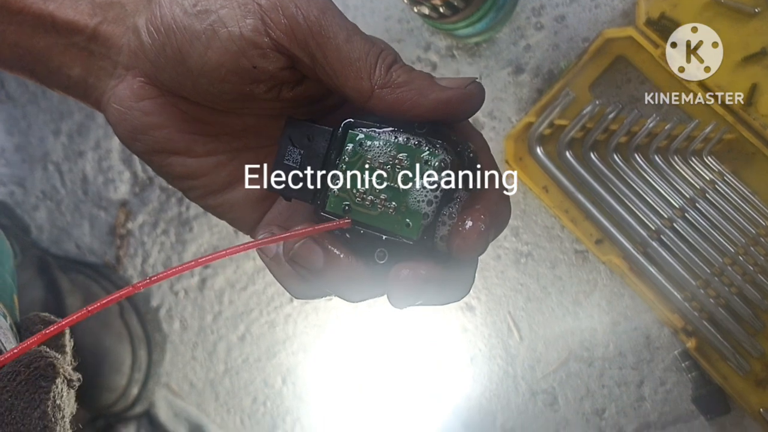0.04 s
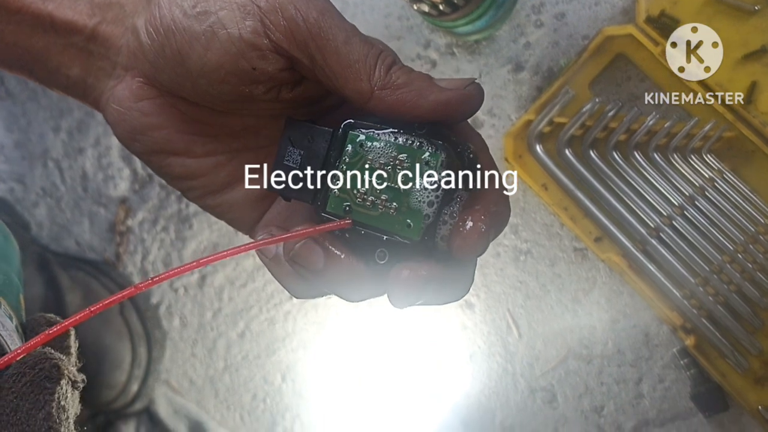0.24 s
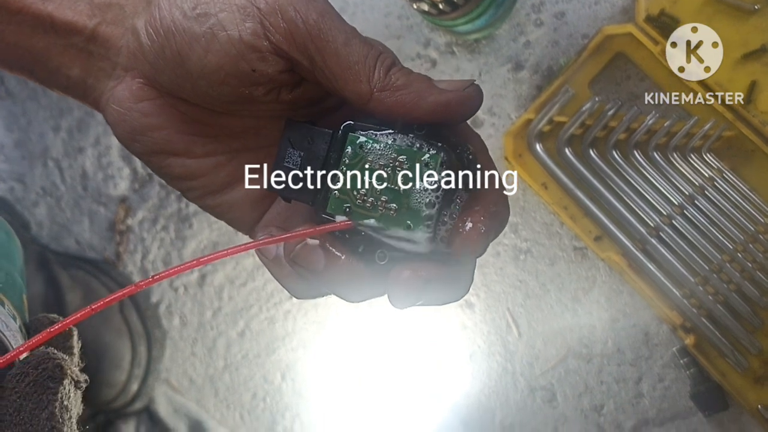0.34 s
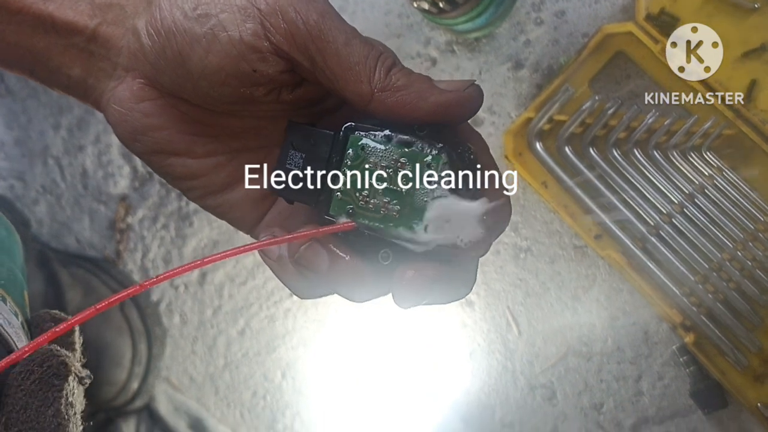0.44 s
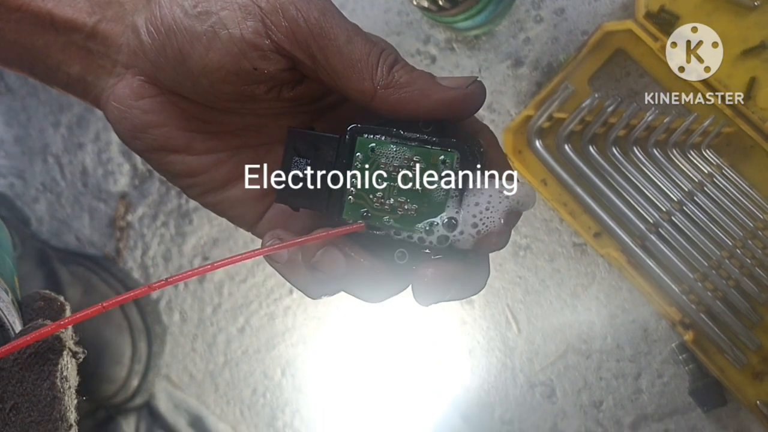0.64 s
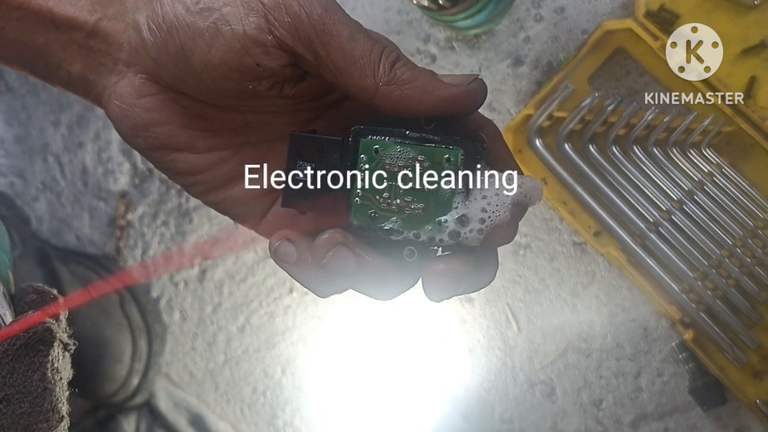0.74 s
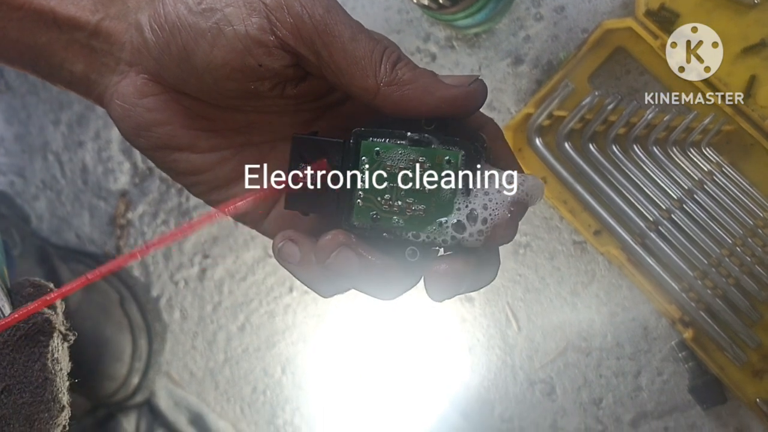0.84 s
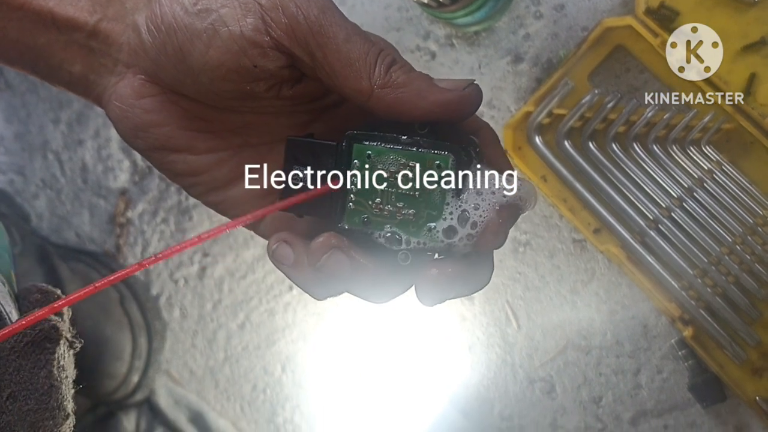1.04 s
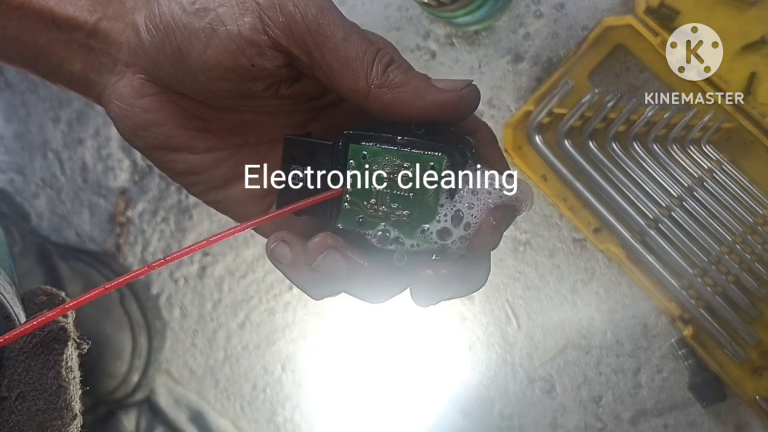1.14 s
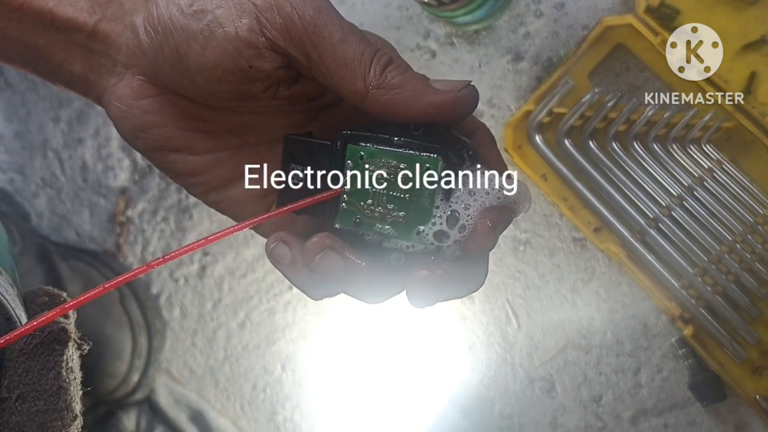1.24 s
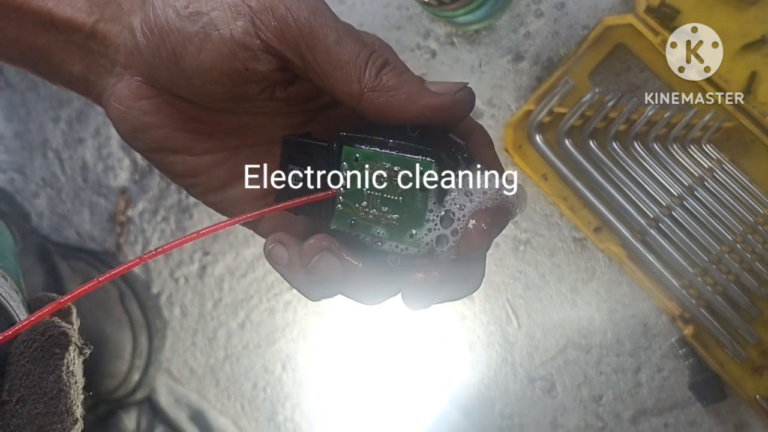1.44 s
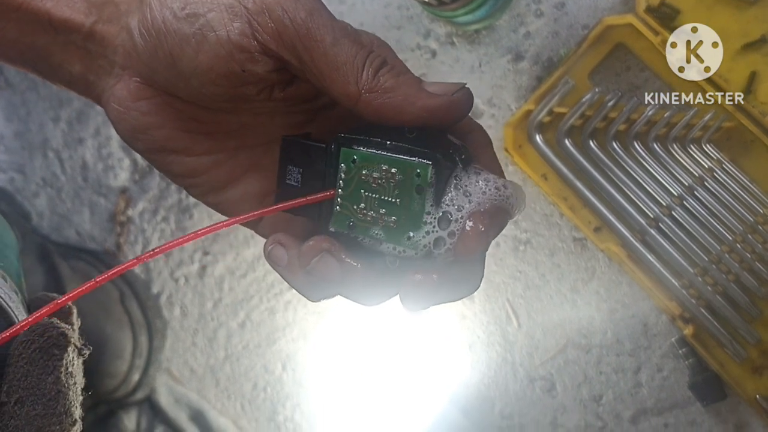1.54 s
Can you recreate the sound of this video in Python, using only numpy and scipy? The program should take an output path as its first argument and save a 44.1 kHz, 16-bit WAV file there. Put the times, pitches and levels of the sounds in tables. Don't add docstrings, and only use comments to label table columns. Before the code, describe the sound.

An aerosol can sprays one short, bright burst through a thin straw at about 0.4 to 0.6 seconds, hissing and faintly whistling, with wet splash and foam on a circuit board. Low gas puffs buffet the close phone microphone from 0.2 to 0.4. Quiet workshop murmur and motor hum continue; from 1.25 a far motor whines upward. Left channel carries everything; right holds only faint hiss.

```python
import sys
import numpy as np
from scipy import signal
from scipy.fft import rfft, irfft
from scipy.io import wavfile
from scipy.ndimage import uniform_filter1d

SR = 44100
rng = np.random.default_rng(int(sys.argv[2]) if len(sys.argv) > 2 else 0)


def gain_from_db(level_db):
    decades = np.asarray(level_db, float) / 20
    return 10 ** decades


def master(y):
    cut = np.clip(np.atleast_2d(y).T, -1, 1)
    pcm = np.round(cut * 32767)
    wavfile.write(sys.argv[1], SR, pcm.astype(np.int16))


N = 70560


def level(x, db):
    return x * gain_from_db(db) / np.sqrt(np.mean(x ** 2))


def noise():
    return rng.standard_normal(N)


def colour(x, table):
    f = np.maximum(np.fft.rfftfreq(N, 1 / SR), 1)
    hz, db = np.array(table, float).T
    fall_db = 18 * np.minimum(np.log2(f / hz[0]), 0)
    gain_db = np.interp(np.log(f), np.log(hz), db) + fall_db
    return level(irfft(rfft(x) * gain_from_db(gain_db), N), 0)


def band(x, hz, width_hz):
    return level(signal.lfilter(*signal.iirpeak(hz, hz / width_hz, SR), x), 0)


def band_twice(x, hz, width_hz):
    return band(band(x, hz, width_hz), hz, width_hz)


def walk(rate_hz):
    hold = int(SR / rate_hz)
    steps = np.repeat(rng.standard_normal(N // hold + 1), hold)
    smooth = uniform_filter1d(uniform_filter1d(steps, hold), hold)[:N]
    return smooth / smooth.std()


def bump(t, centre_s, spread_s):
    return np.exp(-.5 * ((t - centre_s) / spread_s) ** 2)


def turbulence():
    drops_per_s, scatter_db, drop_share = 14000, 1.0, 0.4
    chance, side, size = rng.random((3, N))
    clicks = (chance < drops_per_s / SR) * np.sign(side - .5)
    drops = clicks * gain_from_db(-scatter_db * np.log(size + 1e-9))
    return np.sqrt(drop_share) * level(drops, 0) + np.sqrt(1 - drop_share) * noise()


# start_s, jet_level_db, splash_level_db (re jet)
VALVE = [
    (0.404, -58.5, -10),
    (0.405, -37, -19.5),
    (.415, -28, -16),
    (.423, -28, -18.5),
    (.47, -20, -16),
    (.52, -21.5, -21),
    (0.573, -25, -15),
    (.586, -32.5, -19.5),
    (0.592, -39, -11.5),
]


def valve(t):
    start_s, jet_db, splash_db = np.array(VALVE).T
    dribble_db = 899.5 * np.maximum(t - start_s[-1], 0)
    flow_db = np.interp(t, start_s, jet_db, left=-140) + 8.5 - dribble_db
    return start_s, flow_db, flow_db + np.interp(t, start_s, splash_db) + 3.0


# pitch_hz, level_db (per Hz)
JET_TONE = [(6000, -23), (9300, -17), (10300, -10.5), (11400, -8.5), (12500, 0), (14000, -2), (15500, -3.5)]


def jet(t, flow_db):
    sputter_db = 2.5 * bump(t, 0.4225, 0.00195)
    return colour(turbulence(), JET_TONE) * gain_from_db(flow_db + 0.707 * walk(150.65) + sputter_db)


# pitch_hz, level_db (per Hz)
SPLASH_TONE = [(500, -19), (1200, -6), (2500, -4.5), (3400, 3.5), (4500, 0), (6500, 0.5), (9000, -13),
               (11000, -2)]


def splash(splash_db):
    return colour(turbulence(), SPLASH_TONE) * gain_from_db(splash_db + 0.7 * walk(62.8))


def foam(t, open_s, shut_s):
    ending = np.clip((shut_s - t) / 0.037, 0, 1)
    swell = bump(t, 0.5052, 0.0468) * (t > open_s) * ending
    roar = band(turbulence(), 1950, 1470) * gain_from_db(-38)
    gurgle = band_twice(turbulence(), 431, 515) * gain_from_db(-43)
    return (roar + gurgle) * swell


def straw(t, flow_db, open_s, shut_s):
    note_db = 0.53 * flow_db - 7 - 24.5 + 0.87 * walk(37.17)
    return band(turbulence(), 3430, 396) * gain_from_db(note_db) * (t > open_s) * (t < shut_s)


def room(t, x):
    t60_s, level_db, broad_db = 0.42, -25, -1
    tail = band(noise(), 11900, 5800) + gain_from_db(broad_db) * band(noise(), 4200, 5000)
    tail = (tail * np.exp(-np.log(1000) * t / t60_s))[:SR // 2]
    tail = tail / np.sqrt(np.sum(tail ** 2))
    return gain_from_db(level_db) * signal.fftconvolve(x, tail)[:N]


def spray(t):
    start_s, flow_db, splash_db = valve(t)
    shut_s = start_s[-1]
    burst = jet(t, flow_db) + splash(splash_db) + foam(t, start_s[0], shut_s)
    burst = burst + straw(t, flow_db, start_s[1], shut_s)
    return burst + room(t, burst)


# centre_s, peak_db, pitch_hz, length_cycles
PUFFS = [(.025, -39.5, 101.8, 4.33), (0.059, -39, 94.3, 2.08), (.1, -61.5, 79.6, 1.46),
         (0.171, -42.5, 85, 1.78), (0.731, -50.5, 89.5, 3.6), (0.819, -34, 88.4, 0.89),
         (0.213, -19, 100, 1.983), (.244, -21.5, 129.6, 1.746), (.258, -28, 191, 1.4),
         (.273, -19.5, 154.1, 1.28), (.288, -23.5, 194, 2.1), (0.299, -26.5, 107, 1.63),
         (0.3166, -14.5, 170, 0.64), (0.31, -18.5, 96, 0.93), (0.335, -28, 88, 1.31),
         (0.3576, -16.5, 136.4, 1.447), (0.3726, -13, 305.6, 0.874), (.38, -15, 107.8, 0.768),
         (.39, -14, 141.1, 1.502), (.409, -22, 149.6, 1.65), (.436, -30, 110.7, 3.86),
         (0.468, -26.5, 135, 1.32), (0.488, -30, 99.7, 1.4), (0.523, -35.5, 133, 1.38),
         (0.567, -35.5, 96.7, 1.21), (0.593, -33.5, 84.7, 1.55), (0.639, -32.5, 106.4, 1.48),
         (1.092, -45.5, 89.4, 2.28), (1.49, -44, 95, 2.56)]


def puffs(t):
    lean, edge = 1.1, 0.35
    push, size = np.zeros(N), np.zeros(N)
    for centre_s, peak_db, pitch_hz, cycles in PUFFS:
        turn = (t - centre_s) * pitch_hz
        shape = gain_from_db(peak_db) * bump(turn, 0, 0.4283 * cycles)
        swing = np.cos(2 * np.pi * turn)
        swing = swing - lean * gain_from_db(peak_db + 8) * np.sin(2 * np.pi * turn)
        swing = swing + edge * gain_from_db(peak_db + 4.5) * np.cos(4 * np.pi * turn)
        push = push + shape * swing
        size = size + shape
    eddies = band_twice(noise(), 286, 200) * size * gain_from_db(-22)
    port = signal.butter(2, 54.5, "high", fs=SR, output="sos")
    return signal.sosfiltfilt(port, push + eddies)


# pitch_hz, level_db (per Hz)
SHOP_TONE = [(50, -24), (90, 6.5), (150, -2.5), (350, -6), (1100, -5), (1500, -9.5), (3400, -15.5),
             (3900, -31.5)]


def murmur():
    air_spectrum = rfft(colour(noise(), SHOP_TONE))
    f = np.fft.rfftfreq(N, 1 / SR)
    octave = np.log2(np.clip(f, 64, 4096) / 64)
    swell_db = 0.3 * walk(3.21)
    out = np.zeros(N)
    for k in range(7):
        part = irfft(air_spectrum * np.maximum(1 - np.abs(octave - k), 0), N)
        out = out + part * gain_from_db(-47.5 + swell_db + 0.97 * walk(11.87))
    return out


# pitch_hz, width_hz, level_db
DRONES = [(350.8, 20.1, -54.5), (7377, 317, -67), (14630, 650, -64.5)]


def drones():
    out = np.zeros(N)
    for pitch_hz, width_hz, level_db in DRONES:
        out = out + band(noise(), pitch_hz, width_hz) * gain_from_db(level_db + 0.944 * walk(6.02))
    return out


def draught(t):
    return band(noise(), 98.64, 30.4) * gain_from_db(-51 - 5 * t + 2.5 * walk(13.79))


# multiple, level_db
HUM = [(1, -54.5), (2, -63.5), (3, -62.5), (4, -65)]


def motor_hum():
    turns = np.cumsum(260.86 * (1 + 0.0042 * walk(8.05))) / SR
    out = np.zeros(N)
    for multiple, level_db in HUM:
        tone = np.sin(2 * np.pi * (multiple * turns + rng.random()))
        out = out + np.sqrt(2) * tone * gain_from_db(level_db + 2.985 * walk(13.83))
    return out


# start_s, pitch_hz, level_db
WHINE = [
    (1.23, 2870, -73.5),
    (1.255, 2900, -59.5),
    (1.329, 2971, -62.5),
    (1.359, 3087, -55.5),
    (1.418, 3218, -61.5),
    (1.491, 3288, -57),
    (1.6, 3414, -60),
]


def whine(t):
    start_s, pitch_hz, level_db = np.array(WHINE).T
    width_hz = 130
    out = np.zeros(N)
    for lag_s, lag_db in ((0, 0), (0.05, -7.5)):
        phase = np.cumsum(np.interp(t - lag_s, start_s, pitch_hz)) / SR
        drift = walk(width_hz) + 1j * walk(width_hz) + 0.57
        line = np.real(drift * np.exp(2j * np.pi * phase))
        out = out + line * gain_from_db(np.interp(t - lag_s, start_s, level_db, left=-120) + lag_db)
    return out


# pitch_hz, level_db (per Hz)
HISS_TONE = [(45, -10), (120, 1), (500, -5.5), (3500, -9.5), (3750, -13), (6800, -19), (7100, -25),
             (11400, -21)]


def hiss():
    top_step = (11380, HISS_TONE[-1][1] + 4)
    return gain_from_db(-53) * colour(noise(), list(HISS_TONE) + [top_step])


def scene():
    t = np.arange(N) / SR
    shop = murmur() + drones() + draught(t) + motor_hum()
    left = spray(t) + puffs(t) + shop + whine(t) + gain_from_db(-2.5) * hiss()
    return np.array([left, hiss()])


def band_limit(x):
    return signal.sosfilt(signal.butter(12, 16620, fs=SR, output="sos"), x)


def record(dry):
    low_pass = signal.ellip(12, .2, 80, 15420, fs=SR, output="sos")
    mix = signal.sosfilt(low_pass, dry)
    return band_limit(mix)


dry = scene()
out = record(dry)
master(out)
```